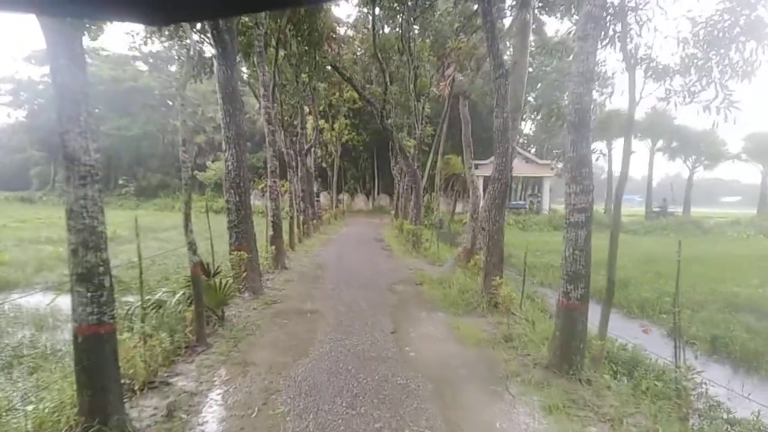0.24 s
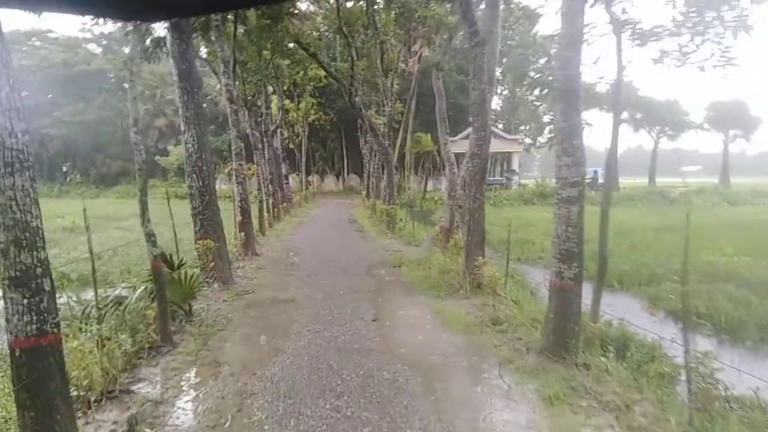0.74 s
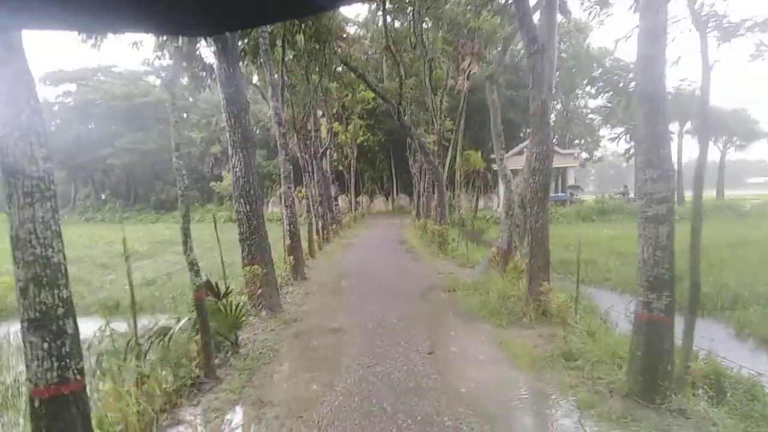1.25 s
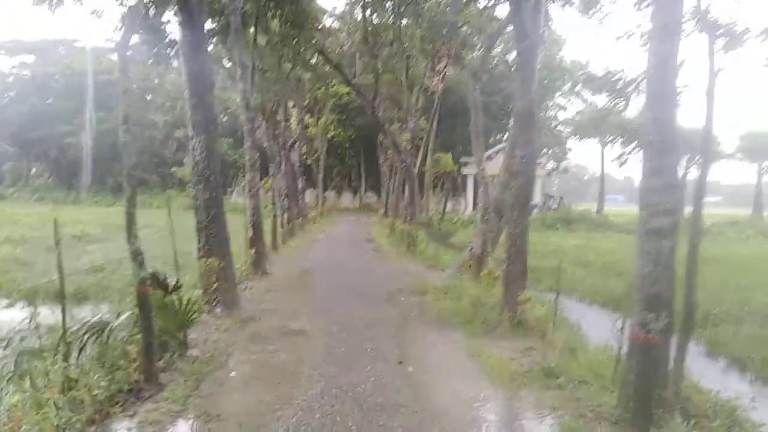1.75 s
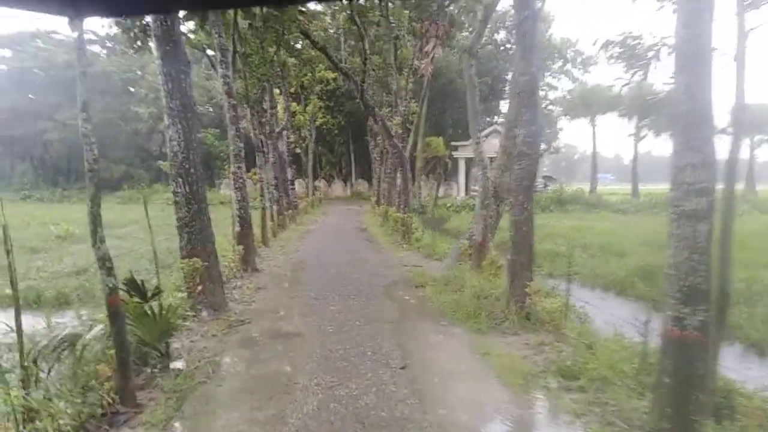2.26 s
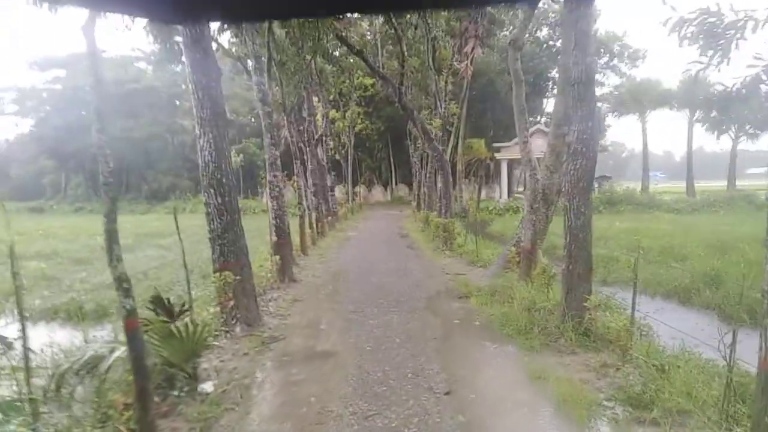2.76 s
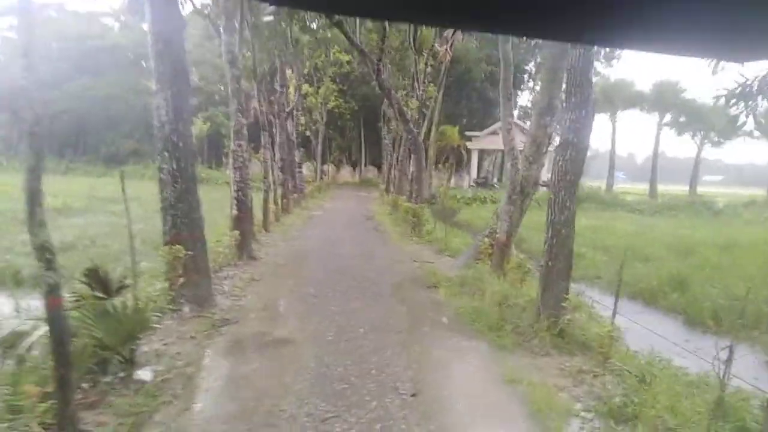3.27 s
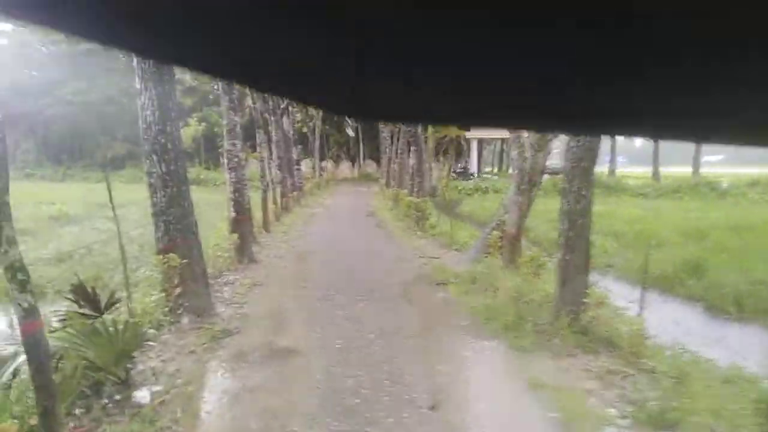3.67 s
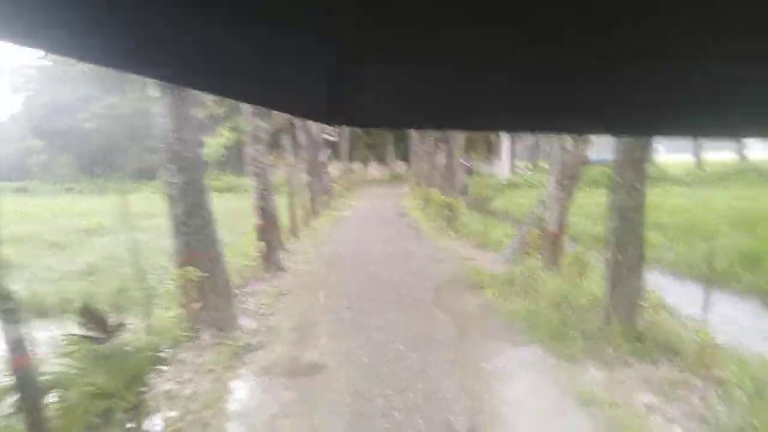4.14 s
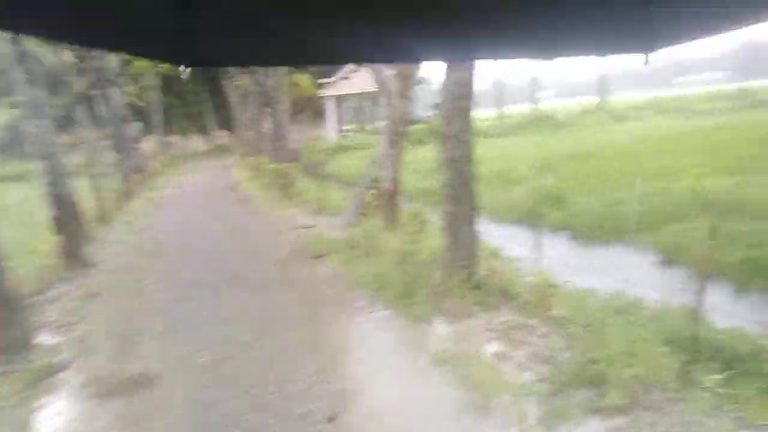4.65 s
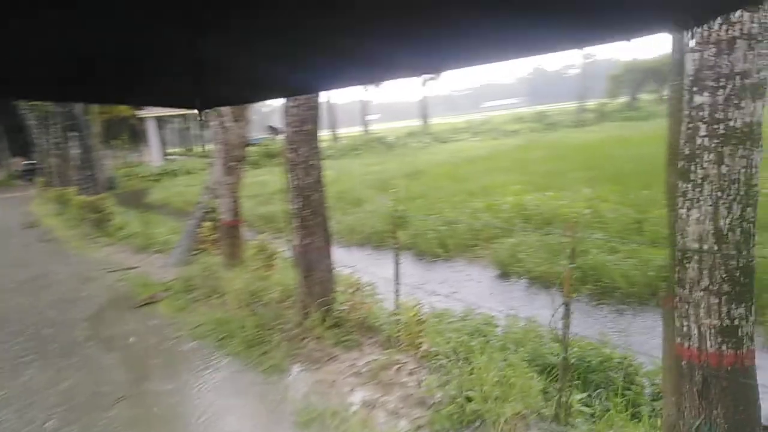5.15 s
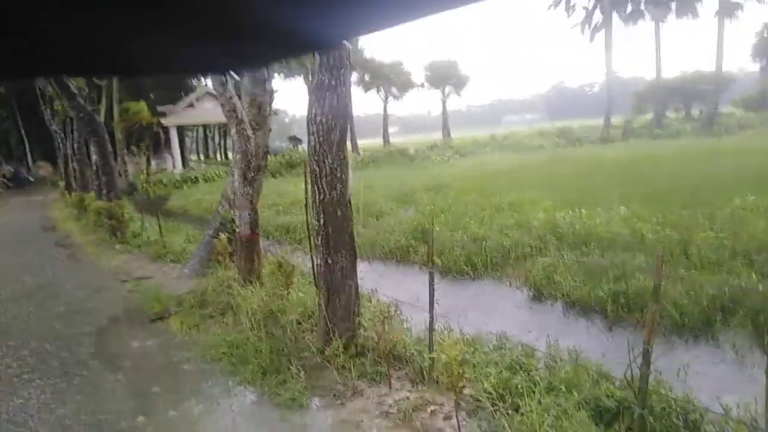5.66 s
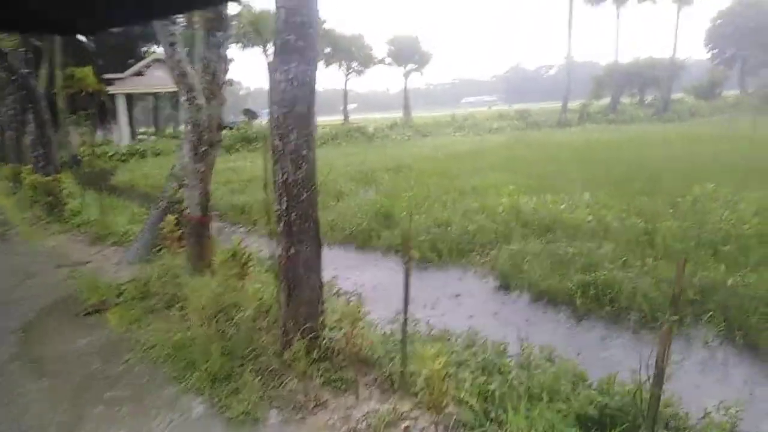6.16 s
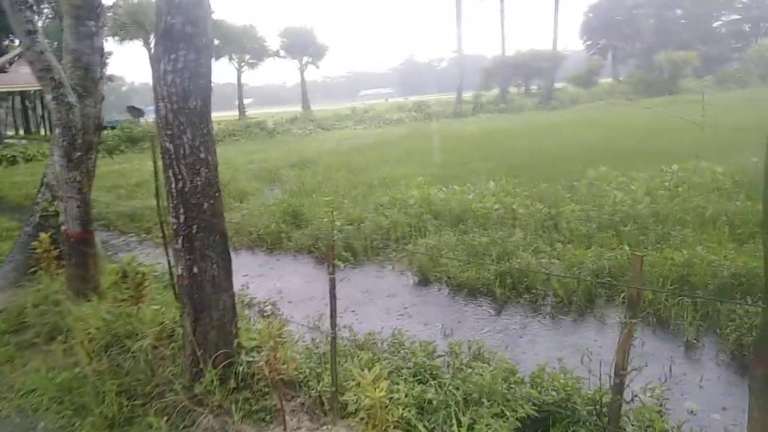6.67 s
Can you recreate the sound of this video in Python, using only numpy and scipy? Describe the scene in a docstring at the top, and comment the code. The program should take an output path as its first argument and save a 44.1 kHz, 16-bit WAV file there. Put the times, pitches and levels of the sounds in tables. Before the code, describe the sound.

Big raindrops knock and tick irregularly on a taut umbrella close overhead, with faint rain hiss, a distant engine drone and low wind thumps.

```python
"""Big raindrops tick and knock on a taut fabric umbrella, over a patter of small drops and a hiss of rain
on the fields. Wind thumps two microphone ports of a hand-held phone, and an engine drones far off.
Each drop is a burst of short decaying tones, low for the knock and high for the tick and spray. Hiss and
wind are shaped noise; the engine is a stack of overtones. The phone's noise suppressor holds the steady
hiss down and lets each band open briefly after a tick."""
import sys
import numpy as np
from scipy import signal
from scipy.fft import rfft, irfft
from scipy.io import wavfile
from scipy.ndimage import uniform_filter1d

SR = 44100
rng = np.random.default_rng(int(sys.argv[2]) if len(sys.argv) > 2 else 0)


def store_wav(level_fs):
    """Save 16-bit WAV to argv[1]."""
    pcm = np.round(np.clip(np.atleast_2d(level_fs), -1, 1) * 32767)
    wavfile.write(sys.argv[1], SR, pcm.T.astype(np.int16))


N = 304686  # length in samples

# Firing speed of a far single-cylinder engine. Each row: start in seconds, firing rate in Hz.
ENGINE_SPEED = [(1.6, 21), (2.15, 24.6), (2.58, 26.8), (2.8, 28), (3.16, 29.6), (3.31, 29.7), (3.45, 25.2),
                (3.75, 27.2), (4.01, 25), (4.41, 22.4), (4.75, 25.7), (5.01, 26.7), (5.38, 29.3),
                (5.87, 25.8), (6.27, 31), (6.66, 28), (6.91, 19.6)]
# How strongly the exhaust passes each overtone. Each row: frequency in Hz, level in dB.
EXHAUST_TONE = [(50, -1), (85, -1), (140, 3.5), (200, -1.5), (290, -4), (345, -33)]
# Colour of the field hiss at the left port. Each row: frequency in Hz, level in dB per Hz.
FIELD_LEFT_COLOUR = [(100, -2.5), (250, 3.5), (1000, 0), (2500, 1), (4500, -2.5), (6500, 2.5), (8000, -3.5),
                     (11000, -15), (14000, -16.5), (15000, -27)]
# Colour of the field hiss at the right port. Each row: frequency in Hz, level in dB per Hz.
FIELD_RIGHT_COLOUR = [(100, 0.5), (250, -5), (1000, -6), (2500, 1.5), (4500, -7.5), (8000, -10),
                      (11000, -11.5), (14000, -15), (15000, -32)]
# Steady wind, mostly on the right port. Each row: start in seconds, level in dB.
STEADY_WIND = [(0.0, -38), (0.22, -45.5), (0.42, -60), (0.56, -43), (0.9, -43.5), (1.4, -35.5), (2.3, -37),
               (3.65, -37), (4.2, -32), (4.9, -28), (5.4, -28), (5.9, -34), (6.3, -40), (6.91, -41.5)]
# Gusts that thump the ports. Each row: start in seconds, hold in seconds, level in dB.
GUST_EVENTS = [(1.28, 0.039, -33), (2.79, 0.017, -26), (3.752, 0.1, -27), (3.912, 0.14, -26.5),
               (4.209, 0.065, -24), (4.354, 0.035, -47), (4.509, 0.1, -27.5), (4.689, 0.018, -20),
               (5.047, 0.022, -23.5), (5.172, 0.039, -28), (5.397, 0.023, -21), (5.443, 0.011, -16),
               (5.496, 0.071, -21.5), (5.582, 0.067, -22), (5.769, 0.017, -26), (5.983, 0.041, -23.5),
               (6.062, 0.059, -25.5), (6.301, 0.0057, -16)]
# Colour of the wind's low thumping. Each row: frequency in Hz, level in dB per Hz.
BUFFET_COLOUR = [(30, -51), (60, 0), (120, 1), (200, -7), (300, -18.5), (380, -26.5)]
# Colour of the rasp in strong wind. Each row: frequency in Hz, level in dB per Hz.
RASP_COLOUR = [(130, -4), (230, 3.5), (600, -18)]
# Low rings of the struck cloth. Each row: frequency in Hz, level in dB, time to fade by 60 dB in seconds.
KNOCK_RINGS = [(391, -4, 0.013), (623, -5, 0.011), (931, -2.5, 0.008), (1405, -0.5, 0.008),
               (1994, 1.5, 0.008), (2554, 5, 0.008)]
# High rings of the struck cloth. Each row: frequency in Hz, level in dB, time to fade by 60 dB in seconds.
TICK_RINGS = [(3327, -1, 0.0045), (4170, -1.5, 0.0045), (5248, -2, 0.0045), (6288, 1, 0.005),
              (7312, -1, 0.005)]
# Rings of the fine spray. Each row: frequency in Hz, level in dB, time to fade by 60 dB in seconds.
SPRAY_RINGS = [(9270, 0, 0.004), (11050, 0, 0.004), (12450, 0, 0.004)]
# Strength of the small drops on the cloth. Each row: start in seconds, knock level of the faintest in dB.
PATTER_STRENGTH = [(0.0, -44), (0.15, -49.5), (0.5, -53), (0.75, -46.5), (0.85, -36), (2.1, -39.5),
                   (2.35, -48), (2.75, -53), (4.0, -49), (4.16, -48.5), (4.6, -59), (4.87, -34.5),
                   (5.08, -43.5), (5.5, -42), (5.77, -42), (6.4, -41.5), (6.56, -41.5), (6.91, -45)]
# Bursts of fine spray, alone or thrown up by a big drop.
# Each row: start in seconds, spray level in dB, left minus right in dB.
SPLASH_EVENTS = [(0.163, -27.5, -18.5), (0.256, -18.5, -11), (0.31, -19, -14.5), (1.067, -20, 1.5),
                 (2.0327, -30.5, 14), (4.9583, -20, 2), (6.231, -20, -8.5), (6.285, -28, -5.5)]
# Big drops. Each row: start in seconds, knock pitch in Hz, tick pitch in Hz, knock level in dB,
# tick level compared with the knock in dB, tick left minus right in dB.
BIG_DROPS = [(0.0411, 1072, 3440, -8.5, -9, 11), (0.103, 700, 3180, -25, -16, 9.5),
             (0.3101, 1530, 3920, -15, -6, 0), (0.412, 1270, 5030, -14, 5, -0.5),
             (0.486, 1184, 5050, -9, -2, 15), (0.569, 610, 6450, -25.5, -13, 5),
             (0.581, 790, 7230, -25, -15, 6), (0.664, 1820, 4400, -23.5, 2, 0),
             (0.727, 1230, 8280, -17, -4, 14.5), (0.802, 800, 3530, -19, -45, 20),
             (0.823, 633, 3860, -24, 4.5, 2.5), (0.8503, 1400, 3480, -13.5, -3.5, -6.5),
             (0.858, 930, 3260, -17, -3, 9), (0.9381, 840, 5180, -20, 0, 6),
             (0.984, 995, 3930, -14.5, -4, 3), (1.012, 1110, 6180, -19.5, 2.5, 13.5),
             (1.035, 1270, 5900, -20.5, -7, 27), (1.044, 1460, 3600, -23, 6, 19),
             (1.054, 1320, 3860, -19, 2, 11), (1.059, 890, 3800, -31, 7, 8),
             (1.063, 1100, 3260, -23, 3.5, 23.5), (1.069, 1010, 3400, -31, -12, 16.5),
             (1.0832, 854, 3320, -17.5, -5, 23), (1.104, 1070, 3560, -14.5, 1.5, 7),
             (1.1241, 1070, 3470, -26, -2, 28), (1.1276, 1100, 3370, -13.5, -7.5, 17),
             (1.1958, 870, 5460, -24, -3, 29), (1.23, 680, 7000, -23.5, -15, -18),
             (1.248, 1400, 3440, -19, -8.5, -12), (1.2672, 1190, 6930, -19, -2.5, 29),
             (1.291, 1110, 7030, -19, 0.5, 14), (1.32, 563, 5910, -25, -15, 7),
             (1.3695, 907, 6260, -19, -5.5, 21), (1.4359, 1120, 5600, -14.5, -6.5, 15),
             (1.453, 850, 3210, -18, -14.5, 17.5), (1.4983, 1250, 4860, -14, -4, 21),
             (1.5273, 970, 4000, -19.5, -43, 22), (1.648, 1650, 3370, -15, -5.5, 19),
             (1.736, 1480, 3230, -15.5, -22, 25), (1.7798, 1090, 5640, -18, -3, 9.5),
             (1.8794, 720, 5000, -18.5, -11, 17), (2.0332, 697, 4320, -24, 3, 8),
             (2.088, 846, 7140, -18.5, -2, 23.5), (2.1049, 844, 5300, -19, 2, 3.5),
             (2.2215, 1016, 4170, -15, -11.5, 27.5), (2.452, 1310, 5900, -20.5, 0.5, 12),
             (2.467, 1460, 5980, -22.5, -5, 29), (2.48, 1370, 5270, -25.5, -31, 25),
             (2.596, 1840, 5160, -23.5, -4.5, 25), (2.793, 690, 4450, -23, 2, 1),
             (3.137, 1074, 3733, -17, -14, -1.5), (3.206, 1270, 3210, -25.5, -36, -4),
             (3.257, 2170, 5350, -26.5, -28, -6), (3.351, 850, 4180, -19.5, 1.5, 4),
             (3.484, 926, 7100, -25, -22, 2), (3.7104, 1160, 3110, -19.5, -7.5, 8.5),
             (4.0257, 660, 4330, -16.5, -15, -11), (4.06, 865, 3900, -19.5, -25, 5.5),
             (4.158, 460, 3090, -20, 0.5, 3.5), (4.2761, 1470, 6430, -24.5, 1, 23),
             (4.3585, 837, 7170, -23.5, -1, 8), (4.4662, 550, 6260, -13.5, -3, 6),
             (4.4919, 580, 4240, -18, -5.5, -3), (4.5666, 830, 3260, -11, 0.5, 14.5),
             (4.5848, 1030, 4900, -9.5, -8.5, 19.5), (4.6786, 1055, 4800, -18, 0, 14),
             (4.6966, 980, 5035, -11, -7.5, 13), (4.714, 870, 4750, -15.5, -14, 9),
             (4.776, 1030, 7170, -12.5, 5.5, 9.5), (4.803, 940, 4630, -5, -5, 7.5),
             (4.823, 1110, 5600, -9, 1.5, 8.5), (4.8301, 1110, 7040, -22, -8, 2),
             (4.868, 651, 4480, -25, 1, 19), (4.888, 637, 3900, -16.5, -6, 11.5),
             (4.913, 980, 5050, -9, -13.5, 21), (4.9208, 790, 6340, -5.5, -8.5, 12),
             (4.9582, 1440, 5750, -15, 4, 13.5), (5.0755, 806, 6350, -19, -4, 21.5),
             (5.146, 1768, 3490, -26.5, 0, 16.5), (5.275, 823, 4280, -19, -8.5, 19.5),
             (5.3568, 1226, 5030, -23.5, -17, -6), (5.396, 480, 4560, -24.5, -1, -3.5),
             (5.417, 544, 7000, -18.5, -3, 8.5), (5.5672, 1250, 4250, -14.5, 7.5, 2),
             (5.5929, 1000, 4800, -6, -3, 10), (5.643, 890, 3640, -21, 1.5, 13),
             (5.6766, 1023, 4680, -18.5, -1.5, 5), (5.784, 492, 4570, -19, -5, -5),
             (5.82, 1070, 3055, -12, -26, 18), (5.8467, 800, 5060, -16, -6, 18),
             (5.8784, 1110, 6470, -17.5, 1.5, 9), (5.9936, 1240, 5750, -12.5, -2, 9.5),
             (6.1145, 903, 7200, -14.5, -7, 13.5), (6.2839, 1360, 3500, -20, -15, 16),
             (6.295, 1030, 3630, -9, -5.5, 10), (6.3286, 1670, 4600, -15, -2.5, -7),
             (6.3814, 1020, 6600, -20.5, -0.5, 15), (6.5269, 1020, 4150, -16, -0.5, 12.5),
             (6.5624, 1220, 5060, -12, -0.5, 17), (6.59, 940, 6130, -17, 1, 16.5),
             (6.6191, 765, 5700, -19, -3, 22), (6.641, 706, 6060, -31.5, 2, 14.5),
             (6.669, 866, 5000, -18, -7, 22), (6.6897, 694, 5070, -22.5, 2.5, 10),
             (6.739, 520, 4475, -25, -18, 16), (6.758, 1540, 5400, -30, -16, 8)]

LEFT_PORT_TICK_DB = 16  # the left port favours the tick over the spray by this much
SPRAY_DB = -15.5  # fine spray of a big drop, compared with its tick


def undb(db):
    """Turn decibels into a gain."""
    return 10 ** (np.asarray(db) / 20)


def unit(x):
    """Scale a sound to an rms of 1."""
    return x / np.sqrt(np.mean(x ** 2))


def curves(table):
    """Join the rows of a table with straight lines: one value per sample for each column."""
    s, *columns = np.transpose(table)
    return [np.interp(np.arange(N) / SR, s, column) for column in columns]


def noise(spectrum):
    """Random noise of rms 1, coloured by a table of frequencies and levels."""
    hz, db = np.transpose(spectrum)
    f = np.maximum(np.fft.rfftfreq(N, 1 / SR), 1)
    gain = undb(np.interp(np.log(f), np.log(hz), db, -90, -90))
    return unit(irfft(rfft(rng.standard_normal(N)) * gain, N))


def walk(rate):
    """A smoothly wandering random level of rms 1, with `rate` new values a second."""
    step = int(SR / rate)
    held = np.repeat(rng.standard_normal(N // step + 1), step)
    return unit(uniform_filter1d(uniform_filter1d(held, step), step)[:N])


def rings(modes, count, scatter_db, detune, favour_hz=None, slope_db=4.0, rise_s=1 / SR, size=384):
    """Fading tones of peak 1, one set per drop; every spot of cloth has its own pitches and strengths."""
    hz, db, t60 = np.transpose(modes)[:, None, :, None]
    chance = rng.standard_normal((count, 2, len(modes), 1))
    if favour_hz is not None:
        # The nearest ring sits on the pitch of the struck spot; rings far from it are weaker.
        nearest = np.abs(np.log(hz[..., 0] / favour_hz[:, None])).argmin(axis=1)
        chance[np.arange(count), :, nearest] = 0
        hz = hz * (favour_hz / hz[0, nearest, 0])[:, None, None]
        db = db - slope_db * np.log2(hz / favour_hz[:, None, None]) ** 2
    t = np.arange(size) / SR
    own_hz = hz * (1 + detune * chance[:, 0])
    turn = (2 * np.pi * own_hz).astype(np.float32) * t.astype(np.float32)
    fade = np.exp(-np.log(1000) * t / t60).astype(np.float32)
    level = undb(db + scatter_db * chance[:, 1]).astype(np.float32)
    ring = -(level * fade * np.sin(turn)).sum(axis=1)  # minus: the pressure falls first
    ring = ring * (1 - np.exp(-t / rise_s))
    ring = ring / np.abs(ring).max(axis=1, keepdims=True)
    return np.pad(ring, ((0, 0), (0, 384 - size)))


def strike(s, knock_hz, tick_hz, knock_db, tick_db, spray_db, tick_pan_db):
    """Drops hit the cloth; the nearer port hears each louder and sooner, with its own mix of the rings."""
    slap_db, slap_s = -4, 0.000082  # dry slap of the impact, compared with the knock, and its decay
    spread_s = 0.000091  # time constant of a drop flattening on the cloth
    port_lag = 7.1  # samples between the ports for a drop far to one side
    out = np.zeros((2, N + 512))
    shared = rings(KNOCK_RINGS, len(s), 2.95, 0.1113, knock_hz)
    t = np.arange(shared.shape[1]) / SR
    slap = (1 - t / (2 * slap_s)) * np.exp(-t / (2 * slap_s)) * (t > 0)
    shared = shared - undb(slap_db) * slap
    # The phone shades the long waves of the knock less than the tick.
    knock_pan_db = 0.24 * tick_pan_db
    spray_pan_db = tick_pan_db - LEFT_PORT_TICK_DB
    for side, sign in enumerate((1, -1)):  # left, then right
        knock = 0.94 * shared + 1.25 * rings(KNOCK_RINGS, len(s), 1.73, 0.121, knock_hz)
        tick = rings(TICK_RINGS, len(s), 3.56, 0.055, tick_hz, slope_db=12.5, rise_s=spread_s, size=160)
        spray = rings(SPRAY_RINGS, len(s), 7.4, 0.097, rise_s=spread_s, size=128)
        sound = undb(knock_db + sign * knock_pan_db / 2)[:, None] * knock
        sound = sound + undb(tick_db + sign * tick_pan_db / 2)[:, None] * tick
        sound = sound + undb(spray_db + sign * spray_pan_db / 2)[:, None] * spray
        start = s * SR + port_lag * (2 - sign * np.tanh(knock_pan_db / 3)) / 2
        np.add.at(out[side], start.astype(int)[:, None] + np.arange(sound.shape[1]), sound)
    return out[:, :N]


def engine():
    """Slightly uneven firings make overtones, shaped by the exhaust, that swell in and draw away."""
    arrives_s, swell_s = 1.66, 0.66
    leaves_s, leave_db_per_s = 4.4, -5
    hz, = curves(ENGINE_SPEED)
    t = np.arange(N) / SR
    turn = 2 * np.pi * np.cumsum(hz * (1 + 0.0037 * walk(28))) / SR
    exhaust_hz, exhaust_db = np.transpose(EXHAUST_TONE)
    stack = np.zeros(N)
    for k in range(2, 16):
        overtone_db = np.interp(np.log(k * hz), np.log(exhaust_hz), exhaust_db, -60, -60)
        stack += undb(overtone_db) * np.cos(k * turn - 0.2104 * k ** 2)
    db = -39 + leave_db_per_s * np.maximum(t - leaves_s, 0)
    swell = np.clip((t - arrives_s) / swell_s, 0, 1)
    return unit(stack) * undb(db + 0.38 * walk(22)) * swell


def field():
    """Countless drops on grass, leaves and road merge into a hiss, made of noise with a grainy level."""
    field_db, pan_db = -36, 3  # pan is left minus right
    colours = (FIELD_LEFT_COLOUR, FIELD_RIGHT_COLOUR)
    hiss = np.array([unit(noise(colour) * undb(2.863 * walk(330))) for colour in colours])
    return undb(field_db + np.array([[pan_db], [-pan_db]]) / 2) * hiss


def wind():
    """Eddies thump each port on their own; every gust rises fast, holds and dies away."""
    rise_s, fall_s = 0.0089, 0.0091  # a straight rise, then an exponential fall
    lee_db, rasp_db = -17.5, 11.5  # sheltered left port; rasp gain on the squared wind
    strength = undb(curves(STEADY_WIND)[0])
    for s, hold_s, db in GUST_EVENTS:
        since = np.arange(N) / SR - s
        rise = np.clip(since / rise_s, 0, 1)
        fall = np.exp(-np.maximum(since - hold_s, 0) / fall_s)
        strength = strength + undb(db) * rise * fall
    left, right = (unit(noise(BUFFET_COLOUR) * undb(2.52 * walk(30))) for _ in range(2))
    right = right + undb(rasp_db) * strength * noise(RASP_COLOUR)  # strong wind rasps
    return strength * np.array([undb(lee_db) * left, right])


def patter(count=2300):
    """Small drops strike the cloth at random moments, many faint and a few stronger."""
    s = rng.random(count) * N / SR
    size = np.minimum(rng.exponential(size=count), 2.8)
    left, bright, spot, splash = rng.standard_normal((4, count))
    knock_hz = 850 * np.exp(0.168 * spot)
    tick_hz = 4500 * np.exp(0.37 * splash)
    knock_db = curves(PATTER_STRENGTH)[0][(s * SR).astype(int)] + 4.99 * size
    tick_db = knock_db - 11 + 3 * bright
    return strike(s, knock_hz, tick_hz, knock_db, tick_db, tick_db - 16, 11 + 9 * left)


def droplets(count=4):
    """Each big drop bursts, and a few droplets land again just after it."""
    s, knock_hz, tick_hz, knock_db, tick_db, tick_pan_db = np.repeat(BIG_DROPS, count, axis=0).T
    late_s = 0.0022 + 0.012 * rng.exponential(size=len(s))  # shortest delay plus a random one
    size, spot, left = rng.standard_normal((len(s), 3)).T
    db = knock_db - 19.5 + 3.42 * size
    return strike(s + late_s, knock_hz * np.exp(0.49 * spot), tick_hz, db, db + tick_db + 5.5,
                  db + tick_db + SPRAY_DB + 6, tick_pan_db + 5 * left)


def splashes():
    """Bursts of fine spray with hardly any knock or tick of their own."""
    s, db, pan_db = np.transpose(SPLASH_EVENTS)
    knock_hz, tick_hz = np.full(len(s), 1260), np.full(len(s), 7500)
    knock_db, tick_db = db - 22.5, db - 38
    return strike(s, knock_hz, tick_hz, knock_db, tick_db, db, pan_db + LEFT_PORT_TICK_DB)


def big_drops():
    """The drops that stand out strike the cloth; a stronger tick comes with more spray."""
    s, knock_hz, tick_hz, knock_db, tick_db, tick_pan_db = np.transpose(BIG_DROPS)
    tick_db = knock_db + tick_db
    return strike(s, knock_hz, tick_hz, knock_db, tick_db, tick_db + SPRAY_DB, tick_pan_db)


def scene():
    """Add up everything that reaches the two ports."""
    return engine() + field() + wind() + patter() + droplets() + splashes() + big_drops()


def suppress(x):
    """Learn the hiss at the start; a band opens well above it, sags while held, then shuts faster."""
    above_db, knee_db = 13, 0.02  # rise that opens a band, and how gradual the opening is
    hold_frames, hold_db, release_db = 9.9, -0.6141, -0.7723  # sag per frame, extra sag after the hold
    learn_frames = 120  # one frame is 256 samples
    f, _, spec = signal.stft(x, SR, nperseg=768, noverlap=512)
    power = uniform_filter1d(np.abs(spec) ** 2, 3, axis=1)  # smoothed over neighbouring bands
    level_db = 10 * np.log10(power + 1e-14)
    usual_db = np.percentile(level_db[..., :learn_frames], 25, axis=2, keepdims=True)
    rise_db = level_db - uniform_filter1d(usual_db, size=7, axis=1)
    shut_db = np.interp(f, [150, 450, 2000, 12000], [-10, -23, -23, -19])[:, None]
    gain_db = shut_db / (1 + np.exp(np.clip((rise_db - above_db) / knee_db, -30, 30)))
    gain_db[..., 0] = 0  # every band starts open
    age = np.zeros(gain_db.shape[:2])  # frames spent sagging
    for k in range(1, gain_db.shape[2]):
        kept_db = gain_db[..., k - 1] + hold_db + release_db * np.clip(age - hold_frames, 0, 1)
        age = np.where(gain_db[..., k] >= kept_db, 0, age + 1)
        gain_db[..., k] = np.maximum(gain_db[..., k], kept_db)
    return signal.istft(spec * undb(gain_db), SR, nperseg=768, noverlap=512)[1][:, :N]


def record(dry):
    """The phone cuts the bass, suppresses noise, rounds the peaks, then cuts the top."""
    bass_cut = signal.butter(3, 62, "high", fs=SR, output="sos")
    top_cut = signal.ellip(8, .2, 80, 14400, fs=SR, output="sos")
    heard = suppress(signal.sosfilt(bass_cut, dry))
    rounded = .9 * np.tanh(heard / .9)
    return signal.sosfilt(top_cut, rounded)


dry = scene()
out = record(dry)
store_wav(out)
```